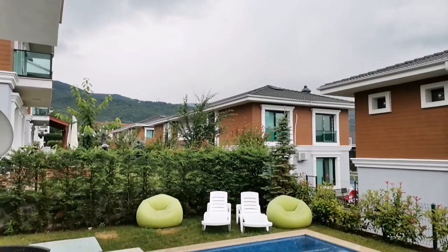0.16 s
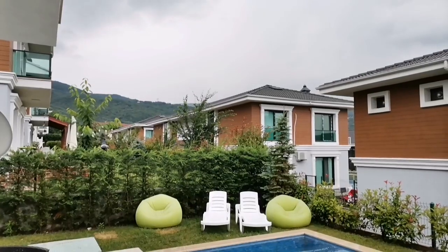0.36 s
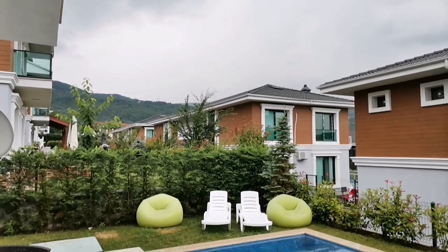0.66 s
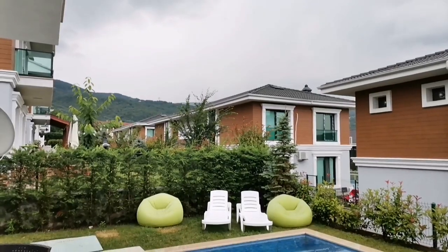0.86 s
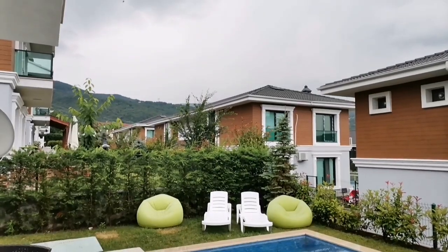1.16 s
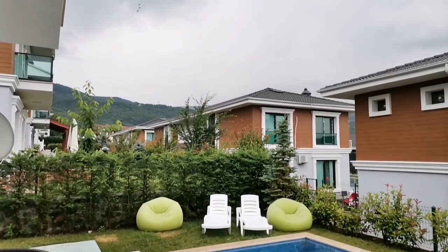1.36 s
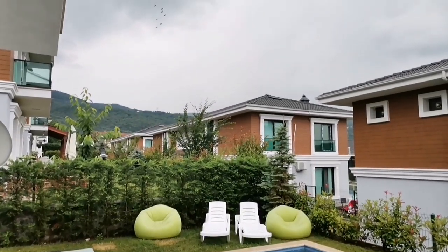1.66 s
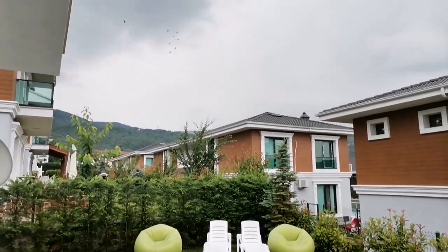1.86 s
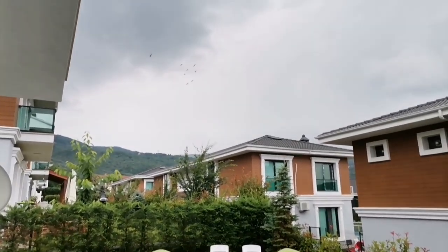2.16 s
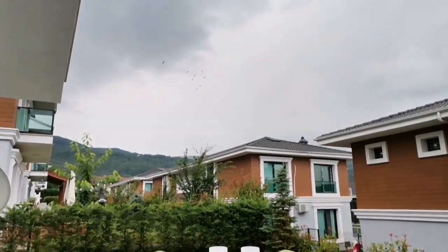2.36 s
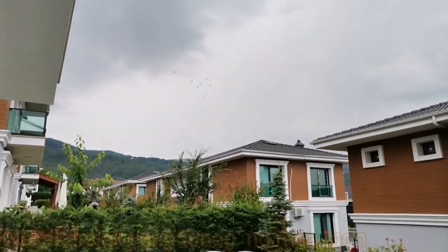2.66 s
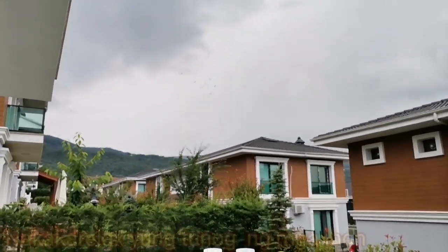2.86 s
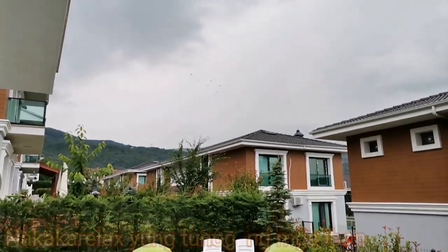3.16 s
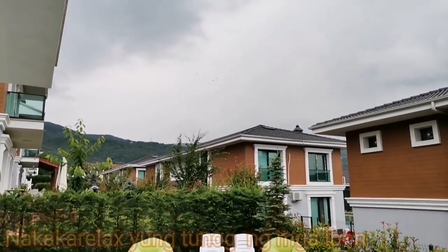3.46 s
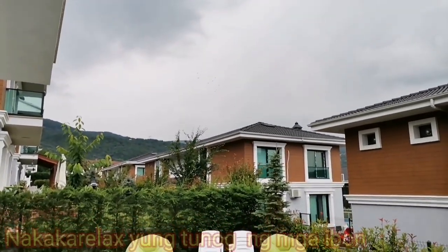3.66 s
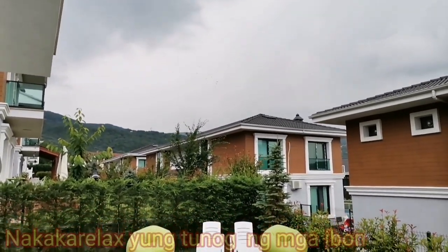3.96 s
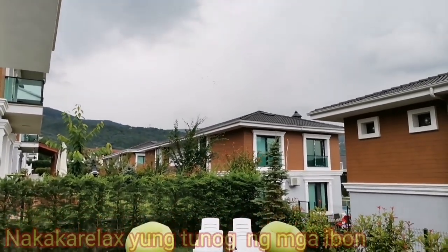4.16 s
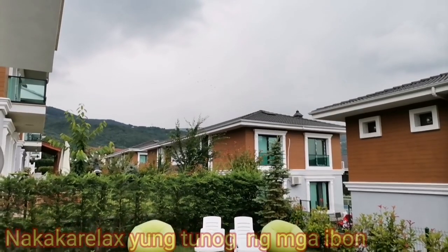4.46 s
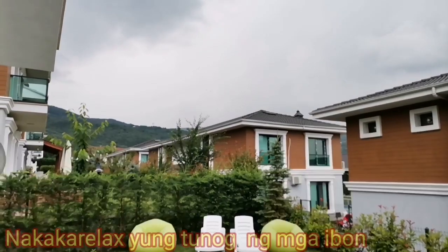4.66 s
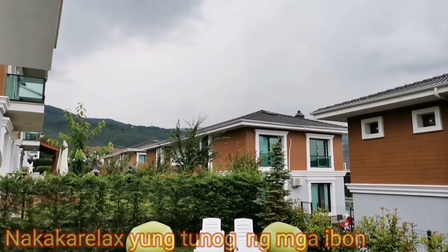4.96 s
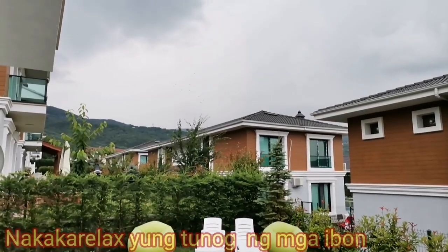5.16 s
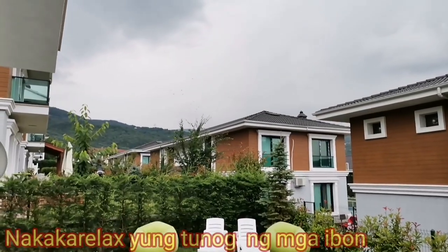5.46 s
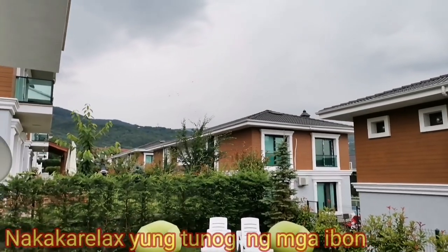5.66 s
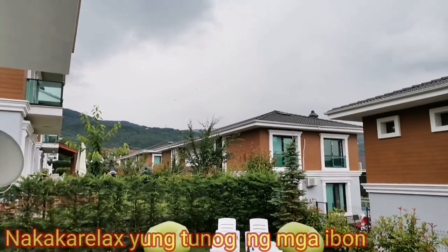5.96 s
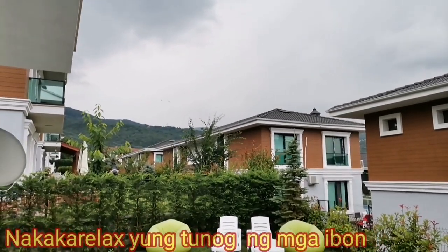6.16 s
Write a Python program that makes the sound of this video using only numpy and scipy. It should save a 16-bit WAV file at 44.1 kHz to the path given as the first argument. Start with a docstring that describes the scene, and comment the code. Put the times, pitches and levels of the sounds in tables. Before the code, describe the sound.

Outdoor stereo sound in a garden between houses: three bright sparrow chirps come early, then a longer gap holds only distant chirps and rough hedge calls, before three more loud ones. Each near chirp scrapes in, arches high, then drops lower, with a short ringing echo. A wavering machine hum, uneven low rumble and soft hiss lie underneath.

```python
"""Sparrows chirp in a garden between houses: one near and loud, one further off, and hoarse calls from the hedges.
Each sparrow chirp is gliding tones: a thin, raspy lead-in, a high arch with an upper voice, then a low arch.
Delayed echoes and fading noise make the house fronts throw the birds back and let them ring.
A distant machine, a set of wavering sines, hums over the filtered noise of town rumble and airy hiss.
Gain control ducks under the loud chirps; the first moment is silent."""
import sys
import numpy as np
from scipy import signal
from scipy.fft import rfft, irfft, next_fast_len
from scipy.io import wavfile
from scipy.ndimage import uniform_filter1d, map_coordinates

SR = 44100
rng = np.random.default_rng(int(sys.argv[2]) if len(sys.argv) > 2 else 0)


def to_wav(sig):
    """Store sig (one row per channel, or 1-D mono) as 16-bit WAV at the path in sys.argv[1].

    Samples outside -1..1 are clipped; the rate is SR.
    """
    pcm = np.clip(np.atleast_2d(sig), -1, 1) * 32767
    pcm = np.round(pcm).astype(np.int16)
    wavfile.write(sys.argv[1], SR, pcm.T)  # frames by channels


N = 278271
TIME = np.arange(N) / SR  # s


def undb(db):
    """Decibels to gain."""
    return 10 ** (np.asarray(db) / 20)


def unit(x):
    """Scale to rms 1."""
    return x / np.sqrt(np.mean(x ** 2))


def wander(rate, size=N):
    """Smooth random curve of rms 1, drawn through `rate` random points a second."""
    steps = np.arange(size) * rate / SR
    points = rng.standard_normal(int(steps[-1]) + 4)
    return unit(map_coordinates(points, [steps + 1], order=2))


def colour(x, spectrum, beyond_db=None):
    """Filter by a spectrum of (Hz, dB) points, joined by straight lines over log frequency."""
    hz, db = np.transpose(spectrum)
    length = x.shape[-1]
    size = next_fast_len(length + SR // 10, real=True)
    f = np.maximum(np.arange(size // 2 + 1) * SR / size, 1)
    gain = undb(np.interp(np.log(f), np.log(hz), db, left=beyond_db, right=beyond_db))
    return irfft(rfft(x, size) * gain, size)[..., :length]


def noise(spectrum):
    """Two unrelated noises with a spectrum of (Hz, dB) points."""
    return unit(colour(rng.standard_normal((2, N)), spectrum, beyond_db=-120))


def add(track, start, sound):
    """Mix a sound into a track from a time in seconds on."""
    i = max(int(start * SR), 0)
    track[i:i + len(sound)] += sound[:N - i]


def bumps():
    """Soft low bumps: short swells of a deep tone whose pitch wanders widely, so that it rumbles unevenly."""
    # Each row: start in seconds, length in seconds, middle pitch in Hz, level in dB.
    bump_rows = [(1.544, 0.24, 59.6, -42), (2.203, 0.35, 53.2, -37), (2.679, 0.12, 48.4, -38.5),
                 (5.425, 0.32, 48.3, -38)]
    out = np.zeros(N)
    for start, length, hz, db in bump_rows:
        size = int(length * SR)
        pitch = hz * (1 + 0.5 * wander(54.2, size))
        phase = 2 * np.pi * np.cumsum(pitch) / SR
        add(out, start, undb(db) * np.hanning(size) * np.sin(phase))
    return out


def swelling():
    """Rise in dB of the low background and of the air: loud at first, then smooth swells over a steady level."""
    # Each row: crest in seconds, length in seconds, rise of rumble and hum in dB, rise of the air in dB.
    swells = [(0.37, 0.41, 5.5, 5), (.94, 0.71, 5, 2.5), (1.52, 0.96, 5.5, -1), (2.282, 0.57, 7, 3),
              (4.32, 0.25, 3.5, 0), (4.838, 0.24, 6.5, 1), (5.43, 0.83, 6, 1.5), (6.18, 0.67, 3.5, 2)]
    early_db, settles_s, settle_time_s = 6, 1.6, 0.1
    early_rise = early_db * (1 - np.tanh((TIME - settles_s) / settle_time_s)) / 2
    rise = np.ones((2, 1)) * early_rise
    for crest_s, length, low_db, air_db in swells:
        crest = np.cos(np.pi * np.clip((TIME - crest_s) / length, -.5, .5)) ** 2
        rise = rise + np.outer([low_db, air_db], crest)
    return rise


def town_rumble(apart_hz=800):
    """Low noise that reaches both microphones nearly alike; above apart_hz they hear more unlike noise."""
    # Each row of the rumble's spectrum: frequency in Hz, level in dB.
    town_spectrum = [(12, -14), (20, -10.5), (48, 2.5), (118, -7), (168, -3.5), (209, -2), (235, -12),
                     (265, -5.5), (358, -13), (445, -12), (526, -9.5), (633, -7), (748, -12), (827, -12),
                     (1100, -26.5), (1430, -99), (2420, -120)]
    mid, side = noise(town_spectrum)
    highpass = signal.butter(2, apart_hz, "high", fs=SR, output="sos")
    side = .26 * side + signal.sosfilt(highpass, noise(town_spectrum)[0])
    return unit(mid + side * np.array([[1], [-1]]))


def machine_hum(waver=0.2213, paths=0.48):
    """Steady lines of a distant machine, whose pitches waver more in Hz the higher they lie."""
    # Each row: pitch in Hz, level in dB against the low background.
    hum_lines = [(177.6, -11), (236.9, -11), (549.1, -15), (586.8, -9), (624.5, -7.5), (683.7, -15.5)]
    hum = np.zeros((2, N))
    for hz, db in hum_lines:
        pitch = hz + np.sqrt(hz) * waver * wander(25)
        phase = 2 * np.pi * np.cumsum(pitch) / SR
        for ear in range(2):  # many paths shift the phase of the higher lines at each microphone
            shift = (hz / 620) ** 2 * (1.87 * ear + paths * wander(18))  # radians
            hum[ear] += undb(db) * np.sqrt(2) * np.sin(phase + shift)
    return undb(2.7 * wander(11.0)) * hum  # the whole hum wavers in level


def background(low_db=-45.5, town_db=-1):
    """Town rumble and machine hum swell together; an airy hiss flickers and swells over them."""
    # Each row of the hiss's spectrum: frequency in Hz, level in dB.
    air_spectrum = [(700, 6), (1100, 1.5), (1550, 2.5), (2200, 1.5), (4000, -3), (6500, -8.5), (9000, -20),
                    (12000, -35.5), (13200, -15), (16000, -27)]
    air_db = np.array([[-54.5], [-53.5]])  # steady level, left and right
    low_rise, air_rise = swelling()
    low_sound = undb(town_db) * town_rumble() + machine_hum()
    air = noise(air_spectrum) * undb(air_db + air_rise + 1.9 * wander(18))
    return low_sound * undb(low_db + low_rise) + air


def arrival(close_s=0.0079):
    """A sharp arrival that ground, ledges and balconies follow within a few ms."""
    t = TIME[:SR // 40]
    close_scatter = rng.standard_normal(len(t)) * np.exp(-t / close_s) / np.sqrt(close_s * SR)
    return .9 * (t == 0) + close_scatter


def garden(song, scatter_db, t60, tail_db, left_db):
    """Direct sound, then duller echoes off the house fronts, scatter from walls and leaves, and a faint tail."""
    # Each echo off a house front: delay in seconds, left level in dB, right level in dB.
    walls = [(.012, -12, -17), (.027, -15, -18), (.057, -12, -18), (.066, -9, -5), (.135, -24, -22)]
    # The house fronts return less of the highest notes. Each row: frequency in Hz, gain in dB.
    wall_colour = [(4500, -1.5), (5600, -5)]
    # Leaves dull all that is thrown back. Each row: frequency in Hz, gain in dB.
    foliage = [(3200, 1), (4500, -1), (5700, -2), (6500, -5), (9000, -6)]
    right_lag, build_s, tail_t60 = 17, .012, .9  # samples, s, s to fall 60 dB
    t = TIME[:SR]
    fade = undb(scatter_db - 60 * t / t60) + undb(tail_db - 60 * t / tail_t60)
    build_up = 1 - np.exp(-t / build_s)
    scatter = rng.standard_normal((2, SR)) * fade * build_up / np.sqrt(SR / 20)
    direct, echoes = np.zeros((2, SR)), np.zeros((2, SR))
    for ear, (lag, db) in enumerate([(0, left_db), (right_lag / SR, 0)]):
        add(direct[ear], lag, undb(db) * arrival())
        for delay, *wall_db in walls:
            add(echoes[ear], delay + lag, undb(wall_db[ear]) * arrival())
    response = direct + colour(scatter + colour(echoes, wall_colour), foliage)
    return signal.fftconvolve(song[None], response, axes=1)[:, :N]


def whistle(shape, ratio, rough, flutter, overtone_db=-36):
    """One syllable: a gliding tone from the syrinx, with trembling pitch and strength and a weak octave."""
    s, hz, db = np.transpose(shape)
    t = np.arange(s[0], s[-1], 1 / SR)
    tremble = 1 + rough * wander(1600, len(t))
    pitch = np.interp(t, s, hz) * ratio * tremble
    phase = 2 * np.pi * np.cumsum(pitch) / SR
    level_db = np.interp(t, s, db) + flutter * wander(600, len(t))
    strength = undb(level_db) * signal.windows.tukey(len(t), .1)  # soft ends
    return strength * (np.sin(phase) + undb(overtone_db) * np.sin(2 * phase))


def hedge_birds(overtone_db=-34, rasp_db=-21, pulse_hz=95):
    """Hoarse, nearly level notes that chatter in fast pulses, with a thin rasp above them."""
    # Each row: start in seconds, length in seconds, middle pitch in Hz, level in dB.
    hoarse_calls = [(0.15, 0.093, 3990, -31), (0.948, .13, 4143, -25.5), (2.773, 0.072, 4253, -29.5),
                    (2.841, 0.033, 3610, -38.5), (3.589, .09, 4150, -30.5), (3.61, 0.089, 5770, -43.5),
                    (3.638, 0.085, 3990, -32), (3.916, 0.056, 3820, -44.5), (4.28, 0.026, 3460, -50),
                    (5.494, 0.046, 3770, -43), (5.645, 0.058, 4210, -26)]
    song = np.zeros(N)
    for start, length, hz, db in hoarse_calls:
        # Each point: time in seconds, pitch in Hz, level in dB.
        shape = [(0, hz * .99, -18), (length * .45, hz * 1.02, 0), (length, hz * .95, -6)]
        note = whistle(shape, 1, rough=.058, flutter=3, overtone_db=overtone_db)
        rasp = whistle(shape, 1.6, rough=.11, flutter=3)
        note = note + undb(rasp_db) * rasp
        pulses = 1 + .5 * np.sin(2 * np.pi * pulse_hz * TIME[:len(note)])
        add(song, start, undb(db) * pulses * note)
    return song


def sparrow(chirps, lead_db, growl_db):
    """A raspy lead-in, a high arch sung with both sides of the syrinx, then a low arch, all through the throat."""
    # Syllable shapes: a thin lead-in and the growl under it, the high arch and its upper voice, the low arch.
    # Each row: seconds from the top of the arch, pitch in Hz before the ratios below, level in dB.
    lead_in = [(-.092, 6500, -26), (-.06, 6450, -13), (-.042, 6300, -6), (-.028, 6100, -3),
               (-.012, 5900, -12)]
    lead_growl = [(-.07, 4200, -24), (-.045, 4100, -9), (-.033, 3900, -1), (-.022, 3800, -2),
                  (-.014, 3700, 3)]
    high_arch = [(-.025, 3500, -14), (-.018, 4000, -3), (-.013, 5000, -2), (-.008, 5650, -3),
                 (.001, 5780, -2), (.009, 5500, -2), (.017, 4700, -1), (.025, 4000, -3), (.033, 3400, -14)]
    upper_voice = [(-.023, 5500, -20), (-.017, 5700, -5), (-.004, 5780, -4), (.012, 5780, -7),
                   (.025, 5650, -20)]
    low_arch = [(-.024, 3250, -18), (-.017, 3330, -3), (-.011, 3600, 2), (-.005, 4150, 3), (.002, 4520, 1),
                (.014, 4480, -2), (.021, 3900, -10), (.028, 3300, -18)]
    # Colour of windpipe and beak. Each row: frequency in Hz, gain in dB.
    throat = [(2100, -24), (2700, -8), (3100, -4), (7200, -8.5), (8300, -9), (11500, 4)]
    song = np.zeros(N)
    for s, db, gap, low_db, low_ratio, upper_db in chirps:
        ratio = 1 + .006 * rng.standard_normal()  # each chirp sits slightly higher or lower
        # Each part: shape, top in seconds, level in dB, pitch ratio, roughness as a share of the pitch.
        parts = [(lead_in, s, lead_db, 1, .07),
                 (lead_growl, s, growl_db, 1, .14),
                 (high_arch, s, 0, 1, .03),
                 (upper_voice, s, upper_db, 1, .016),
                 (low_arch, s + gap, low_db, low_ratio, .028)]
        for shape, top, part_db, part_ratio, rough in parts:
            syllable = whistle(shape, ratio * part_ratio, rough, flutter=2.2)
            add(song, top + shape[0][0], undb(db + part_db) * syllable)
    return colour(song, throat)


def fizz(song, db, growth=1.0, window_s=0.043):
    """A broad, flickering sizzle: noise that follows the smoothed strength of the loud chirps."""
    # Each row of the sizzle's spectrum: frequency in Hz, level in dB.
    sizzle = [(6000, 9.5), (8500, -0.5), (10000, -6.5), (11500, -5), (12500, -12), (13500, -6.5),
              (16000, -7)]
    power = np.abs(uniform_filter1d(song ** 2, size=int(window_s * SR)))
    strength = power ** (growth / 2)
    return strength * noise(sizzle) * undb(db + 2 * wander(120))


def scene():
    """The birds in their garden over the background."""
    # Two-part chirps of the near and of the further sparrow.
    # Each row: top of the high arch in seconds, level in dB, seconds on to the top of the low arch,
    # low arch level in dB, low arch pitch ratio, upper voice level in dB.
    near_chirps = [(.509, -9, 0.094, -3, 1.03, -1.5), (1.107, -11, 0.088, -1.5, 1.003, -3),
                   (1.857, -8.5, 0.1, -4.5, .99, 0), (4.487, -10.5, 0.09, -3, 0.97, -3.5),
                   (4.954, -10.5, .092, -1.5, 1, -3), (5.737, -11, .094, -1.5, 1.02, 1.5)]
    further_chirps = [(.349, -37, 0.091, 6, 1.03, -4), (.815, -36, 0.096, -3, 1.04, -9),
                      (2.095, -37, 0.093, 4, 1.08, -6), (2.617, -40.5, 0.089, 3, 1.07, 0),
                      (3.083, -43.5, 0.085, -0.5, 1.03, -1), (4.012, -45, 0.091, -0.5, 1, 6),
                      (5.143, -43.5, 0.084, 10, 1.02, 6), (5.622, -33, .12, -20, 1, -4)]
    # Colour of the further sparrow behind the hedge. Each row: frequency in Hz, gain in dB.
    hedge_colour = [(3500, -3.5), (4600, 3.5), (5500, 5.5), (6500, -0.5), (11000, -11)]
    hedges = garden(hedge_birds(), scatter_db=-1, t60=0.5, tail_db=-30, left_db=-4)
    further = colour(sparrow(further_chirps, lead_db=-15, growl_db=-11), hedge_colour)
    further_heard = garden(further, scatter_db=1.5, t60=.42, tail_db=-16, left_db=0)
    near = sparrow(near_chirps, lead_db=-7, growl_db=-8)
    near_heard = garden(near, scatter_db=-.5, t60=.41, tail_db=-17, left_db=-2.2)
    birds = near_heard + fizz(near_heard[1], db=-29.5) + further_heard + hedges
    return birds + background() + bumps()


def record(dry, knee_db=-40, squeeze=0.22, release_s=0.11):
    """Two unlike microphones; gain control looks ahead, turns loud moments down and recovers; the top is cut."""
    # Left microphone against the right. Each row: frequency in Hz, gain in dB.
    left_colour = [(800, -0.5), (1300, 0), (2500, -3), (4400, -3.5), (8000, 1), (13000, 6)]
    start_s, top_hz = .18, 15800  # silence before, steep cut above
    heard = np.array([colour(dry[0], left_colour), dry[1]])
    # the averaging window, in samples, lies almost wholly ahead of the moment it controls
    power = uniform_filter1d(np.mean(heard ** 2, axis=0), size=4000, origin=-1900)
    keep = np.exp(-1 / (release_s * SR))
    held = np.abs(signal.lfilter([1 - keep], [1, -keep], power))
    gain = (1 + held / undb(knee_db) ** 2) ** (-squeeze / 2)
    lowpass = signal.ellip(10, .2, 80, top_hz, fs=SR, output="sos")
    return signal.sosfilt(lowpass, heard * gain * (TIME > start_s))


dry = scene()
out = record(dry)
to_wav(out)
```